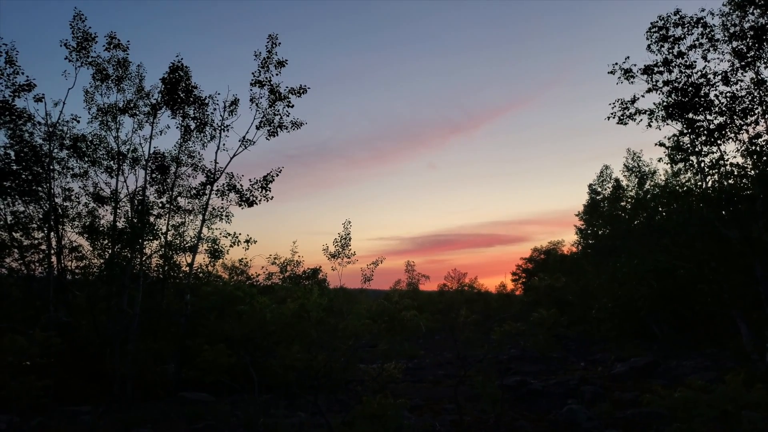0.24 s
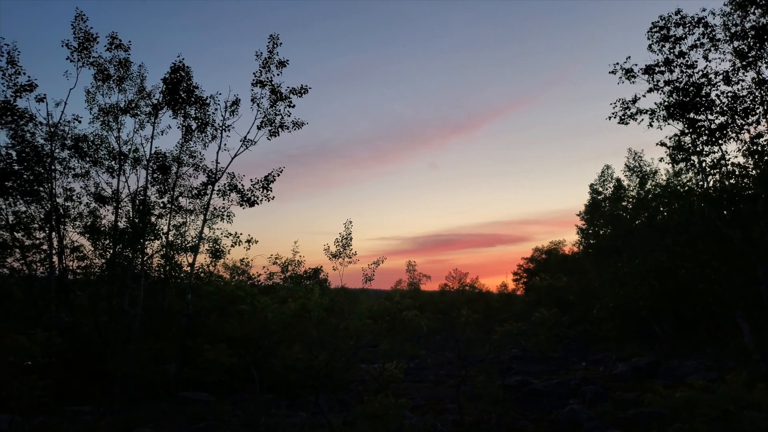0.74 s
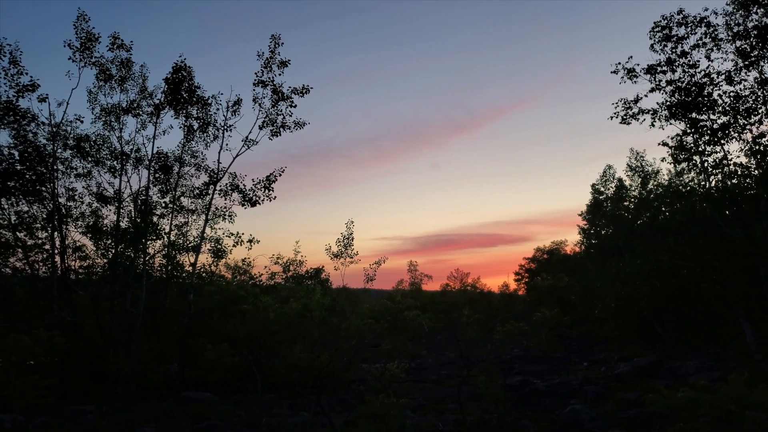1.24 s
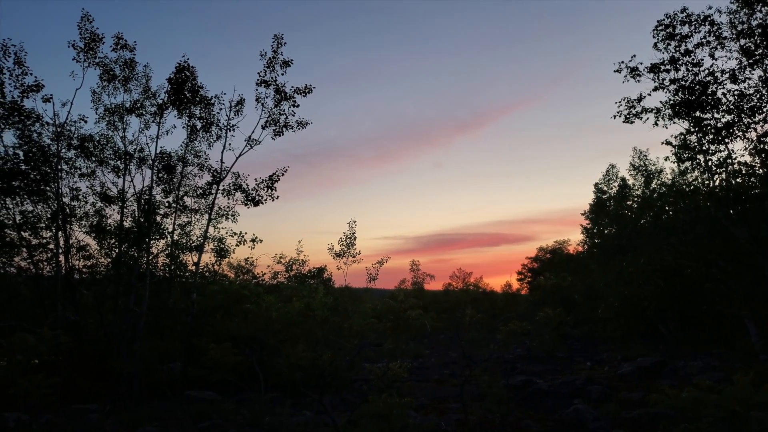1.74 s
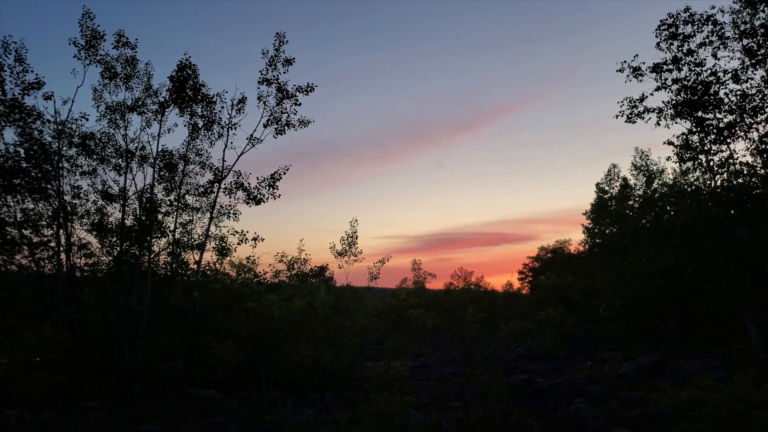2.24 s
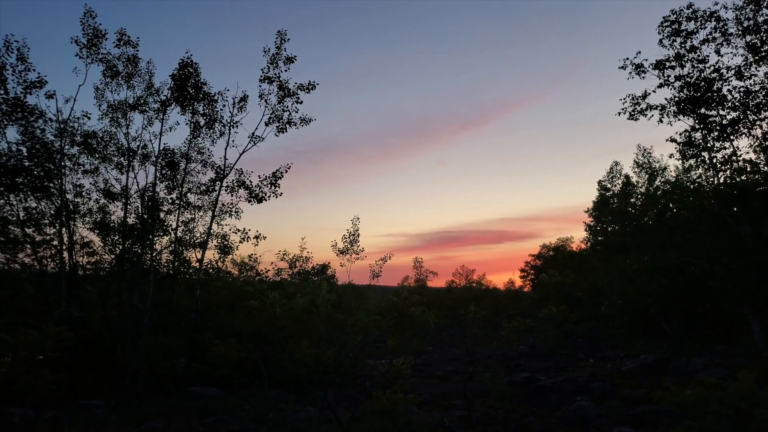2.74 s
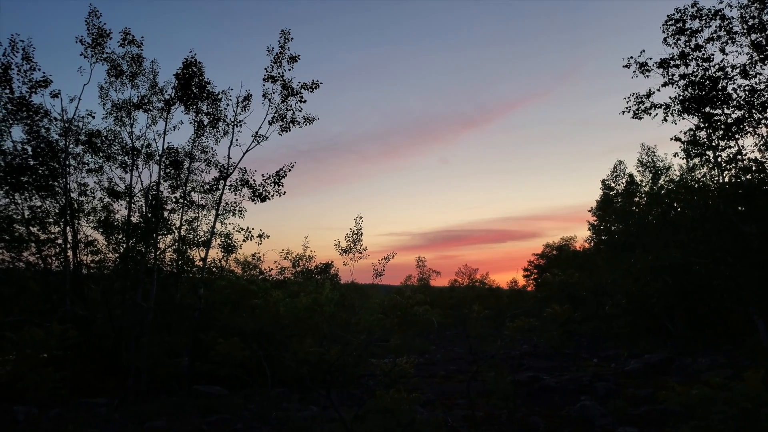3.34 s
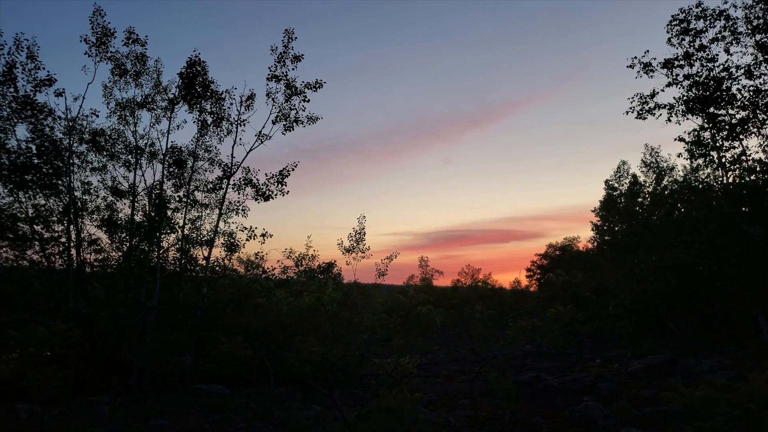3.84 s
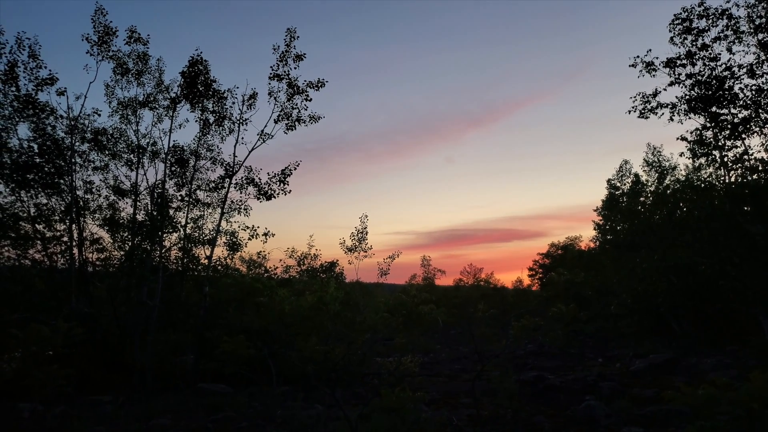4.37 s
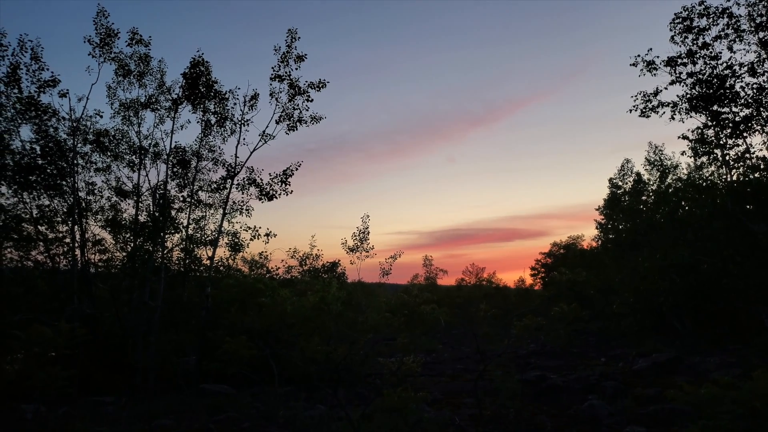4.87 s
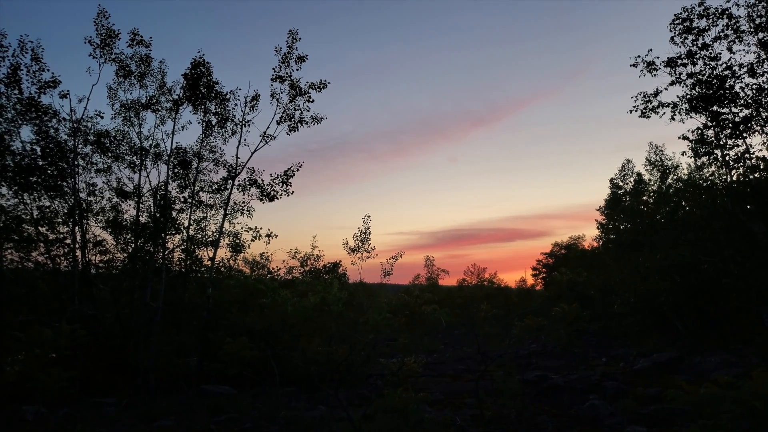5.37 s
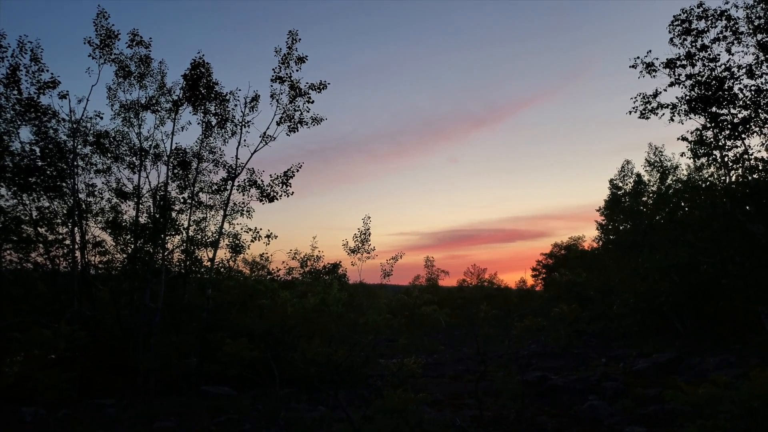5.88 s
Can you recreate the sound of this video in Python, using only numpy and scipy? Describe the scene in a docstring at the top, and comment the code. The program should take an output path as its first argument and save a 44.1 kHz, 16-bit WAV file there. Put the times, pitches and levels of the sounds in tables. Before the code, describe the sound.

A whip-poor-will whistles its three-note song six times in a dusk clearing, echoing off trees, while nighthawks buzz harshly and treefrogs trill faintly behind.

```python
"""A clearing at dusk. A whip-poor-will sings six times from the left: three frequency-modulated whistled notes
that echo in the trees; a soft cluck leads into each song but the first, and one more ends the scene.
Nighthawks, high tones chopped into pulses, buzz near and far; another bird adds a thin rising whistle.
Behind them lie pulsed treefrog trills in a wash of filtered noise, faint blurred bird calls, soft low bumps,
a low rumble with a faint hum, a murmur, and microphone hiss."""
import sys
import numpy as np
from scipy import signal
from scipy.fft import rfft, irfft, next_fast_len
from scipy.io import wavfile
from scipy.ndimage import uniform_filter1d

SR = 44100
rng = np.random.default_rng(int(sys.argv[2]) if len(sys.argv) > 2 else 0)


def wav_out(sig):
    """Save sig, one row per channel (or a flat mono array), as 16-bit PCM at SR to the path in sys.argv[1]."""
    wavfile.write(sys.argv[1], SR, np.round(np.clip(np.atleast_2d(sig).T, -1, 1) * 32767).astype(np.int16))


N = 269451
TIME = np.arange(N) / SR  # seconds

# All levels in dB are relative: each layer is also weighted where it is mixed.
# Treefrog chorus over time. Each row: time in seconds, chorus level in dB, nearest trills in dB against the wash.
FROG_LEVELS = [(0, -59, -10), (.3, -58.5, 0), (.65, -50, -8), (1.3, -59.5, 7), (2.3, -51, -11.5),
               (3.2, -55, -14.5), (4.4, -49.5, 4), (5.5, -56.5, -1), (6.1, -55.5, -1.5)]
# One pulse of a treefrog's trill. Each row: time in seconds, fundamental in Hz, level in dB.
FROG_PULSE = [(0, 842, -32.5), (.012, 916, 0.5), (.022, 1153, 3.5), (.032, 1100, -18)]
# Spectrum of the merged far-off frogs. Each row: frequency in Hz, level in dB.
CHORUS_SPECTRUM = [(700, -44), (850, -26.5), (980, -3.5), (1150, -11.5), (1400, -3.5), (1600, -17),
                   (1900, 6.5), (2150, -3.5), (2350, -15.5), (2550, -25), (2750, -23.5), (3000, -35),
                   (5000, -42)]

# Low background beside a moderate song. Each row: time in seconds, rumble in dB, swelling part of the murmur in dB.
LOW_LEVELS = [(0, -58, -59.5), (1.3, -60, -72), (2.7, -62, -68), (3.9, -59.5, -67.5), (4.5, -58, -73.5),
              (5.25, -58, -61.5), (5.7, -58.5, -78), (6.11, -54, -59.5)]
# Spectrum of the low rumble. Each row: frequency in Hz, level in dB.
RUMBLE_SPECTRUM = [(12, -28.5), (22, -14.5), (32, -9.5), (50, -2.5), (68, 5.5), (90, 0.5), (115, -3),
                   (150, -11.5), (250, -48.5)]
# Spectrum of the soft murmur. Each row: frequency in Hz, level in dB.
MURMUR_SPECTRUM = [(100, -18.5), (170, -2.5), (260, -1.5), (400, -4), (650, -9), (1000, -8), (3000, -8),
                   (6000, -33)]
# Spectrum of the microphone hiss. Each row: frequency in Hz, level in dB.
HISS_SPECTRUM = [(2000, 0.5), (5000, 0.5), (7500, -9), (10000, -3), (12500, 2), (16000, -1.5)]

# Faint far-off bird calls.
# Each row: centre in seconds, length in seconds, centre pitch in Hz, bandwidth in Hz, level in dB.
FAR_CALLS = [(.06, 0.17, 3430, 250, -70.5), (0.26, 0.073, 2750, 109, -71), (0.461, 0.093, 2646, 127, -68),
             (1.845, 0.11, 3780, 348, -57.5), (2.867, .25, 4140, 541, -63.5), (2.942, 0.19, 3570, 450, -71),
             (4.17, 0.07, 3090, 129, -55), (4.175, 0.13, 4100, 250, -54.5), (4.68, 0.25, 4050, 597, -61.5)]
# Thin rising whistle. Each row: time in seconds, pitch in Hz, level in dB.
RISING_WHISTLE = [(4.12, 3674, -58), (4.16, 3640, -56), (4.29, 3814, -52.5), (4.37, 4037, -48.5),
                  (4.46, 4087, -58), (4.52, 4190, -68), (4.6, 4380, -62.5), (4.72, 4420, -65)]

# Nighthawk calls. Each row: start in seconds, nominal length in seconds, level in dB, swell from start to end
# in dB, echo in dB, treble in dB, pitch shift in Hz, lag of the right ear in seconds.
NIGHTHAWK_CALLS = [(.445, .255, -42.5, -4.5, -14, -19, 150, 0),
                   (0.869, 0.2, -53, 13, -10.5, -2.5, 39.5, .0019),
                   (1.858, 0.22, -32.5, -1.5, -14, -1.5, -69.5, 0.021),
                   (3.308, .22, -30.5, -6, -11.5, -0.5, 36, 0.0046),
                   (3.934, .22, -50, -9, -6, -15.5, 0, 0.0012),
                   (5.083, .24, -30, -4.5, -15.5, 0, -1.5, .0068),
                   (5.65, 0.26, -45, 0, -19.5, -31.5, -91.5, .032)]
# Course of one such call. Each row: share of its length, pulses per second, pitch in Hz, level in dB.
NIGHTHAWK_COURSE = [(0, 244, 4400, -29), (.11, 242, 4750, -4.5), (.3, 240, 4840, .5), (.46, 235, 4760, .5),
                    (.62, 238, 4480, -.5), (.74, 246, 4130, -1.5), (.85, 252, 3830, -1.5),
                    (.95, 248, 3650, -3), (1.04, 240, 3560, -22)]
# Tones carried by every pulse. Each row: multiple of the pitch, level in dB, pulse width in seconds.
PULSE_TONES = [(0.99, 1.6, 0.00039), (4 / 5, -6, 0.00021)]
# Spectrum of the broad rasp around the tones. Each row: frequency in Hz, level in dB.
RASP_SPECTRUM = [(1800, -44), (2600, -10), (3200, -5.5), (3900, 8), (4900, -4.5), (5500, -13), (6500, -22),
                 (9000, -49.5)]
# Spectrum of the call's treble. Each row: frequency in Hz, level in dB.
TREBLE_SPECTRUM = [(4500, -28.5), (5800, -8), (6600, 3), (7600, -4.5), (8800, -5.5), (9900, -12),
                   (10700, -14.5), (11600, -21), (13000, -40.5)]

# Whip-poor-will songs. Each row: time of "whip" in seconds, time of "poor" in seconds, peak of "will" in seconds,
# length of its drop in seconds, level of "whip" in dB, level of the other notes in dB, pitch shift in Hz.
SONGS = [(0.4528, 0.789, 0.97, 0.067, -5.5, -3, -14), (1.4335, 1.7618, 1.937, 0.067, -2, -0.5, 15),
         (2.37, 2.688, 2.873, 0.069, 0, -1, -5), (3.3094, 3.631, 3.8161, 0.065, 0.5, -.3, -15),
         (4.265, 4.5908, 4.7758, 0.06, -.5, 0, 15), (5.2088, 5.5284, 5.7179, 0.064, 1, 0, 0)]
# Arched syllables of "whip". Each row: delay from the note's time in seconds, rise in seconds, fall in seconds,
# start pitch in Hz, top pitch in Hz, end pitch in Hz, level in dB, swell from start to end in dB.
WHIP_SYLLABLES = [(-.001, 0.018, 0.013, 1301, 1418, 1420, -28, 6),
                  (.013, .042, .04, 1433, 1695, 1544, -31, -7.5)]
# Arched syllables of "poor". Each row: delay from the note's time in seconds, rise in seconds, fall in seconds,
# start pitch in Hz, top pitch in Hz, end pitch in Hz, level in dB, swell from start to end in dB.
POOR_SYLLABLES = [(-.075, .05, .028, 1190, 1288, 1253, -40, 14),
                  (-.008, 0.0457, 0.03794, 1329, 1563, 1211, -26, 5.8),
                  (.064, 0.04364, 0.037, 1290, 1580, 1347, -25.5, 1)]
# Overtones of the whistle. Each row: multiple of the fundamental, level in dB.
OVERTONES = [(2, -46.5), (3, -46), (4, -49.5)]
# Instants of the soft clucks. Each entry: time in seconds.
CLUCK_TIMES = [1.351, 2.29, 3.23, 4.188, 5.133, 6.074]
# The falling cluck. Each row: time from its instant in seconds, pitch in Hz, level in dB.
CLUCK = [(-.006, 1150, -68), (.003, 994, -46), (.011, 754, -65), (0.017, 700, -62.5), (.03, 620, -74.5)]
# Colour of the trees that return the song late. Each row: frequency in Hz, gain in dB.
LATE_ECHO = [(1300, -2), (1560, 0), (1660, 3), (1760, -1), (1860, -8), (2200, -11), (2700, -16)]

# Soft low bumps. Each row: time in seconds, level in dB.
BUMPS = [(1.57, -44), (1.948, -41), (5.641, -43), (5.811, -42.5)]

# The low background follows the animals' level about this reference, by a share of each dB.
MODERATE_SONG_DB = -35
RUMBLE_FOLLOWS, MURMUR_FOLLOWS, MURMUR_REST_DB = .3, 0.67, -70
RUMBLE_SMOOTH_S, MURMUR_SMOOTH_S, MURMUR_LAG_S = .07, 0.29, .04

# "will" climbs in quick steps to its top, drops, levels out and droops as it ends.
WILL_TOP_HZ, WILL_LEVEL_OUT_HZ, WILL_DB = 2713, 1762, -17
CLIMB_S, CLIMB_HZ_PER_S, CLIMB_DB = .052, 24000, 9.5
STEP_S, STEP_SWING_HZ, STEP_DIP_DB = .0127, 135, 9
DROP_HALF_S, DROOP_HZ, DROOP_S = .015, 262, 0.0089
ATTACK_S, RELEASE_S = 0.0093, 0.033
PORT_LAG_S = .00005  # the song reaches the right microphone port later
CUTOFF_HZ = 15800


def from_db(db):
    """Amplitude gain is the exponential of the level in decibels."""
    return 10 ** (np.asarray(db) / 20)


def rms_one(x):
    """Normalisation: dividing by the effective value gives an rms of one."""
    return x / np.sqrt(np.mean(x ** 2) + 1e-20)


def along(rows, t):
    """Linear interpolation: the columns of a table read at t, its first column."""
    knots, *columns = np.transpose(rows)
    return [np.interp(t, knots, c) for c in columns]


def delayed(x, lag_s):
    """Propagation delay: the same signal, lag_s later."""
    return np.interp(TIME - lag_s, TIME, x)


def pan(left_db):
    """Level difference between the ears: gains of two channels that differ by left_db."""
    return from_db(np.array([[.5], [-.5]]) * left_db)


def colour(x, spectrum):
    """Linear filtering: each frequency is weighted by a (Hz, dB) curve."""
    hz, db = np.transpose(spectrum)
    size = next_fast_len(x.shape[-1])
    bins = np.maximum(np.arange(size // 2 + 1) * SR / size, 1)
    gain = from_db(np.interp(np.log(bins), np.log(hz), db))
    return irfft(rfft(x, size) * gain, size)[..., :x.shape[-1]]


def drift(rate, size):
    """Slow random modulation: lines join `rate` normal draws of unit deviation per second."""
    return np.interp(np.arange(size) / SR * rate, np.arange(4000), rng.standard_normal(4000))


def stereo_noise(spectrum, alike):
    """Partial coherence: shared and opposed noise give the channels the correlation `alike`; rms one."""
    mid, side = rng.standard_normal((2, N))
    alike = np.clip(alike, -1, 1)
    shared = np.sqrt(1 + alike) * mid
    opposed = np.sqrt(1 - alike) * side * [[1], [-1]]
    return rms_one(colour(shared + opposed, spectrum))


def woods(x, t60, build_s, grain_db):
    """Multiple scattering: echoes from countless trunks build up and decay, unrelated in the two channels."""
    t = TIME[:2 * SR]
    grain = from_db(grain_db * rng.standard_normal((2, len(t))))
    scatter = rng.standard_normal((2, len(t))) * grain
    envelope = from_db(-60 * t / t60) * (1 - np.exp(-t / build_s))
    response = rms_one(scatter * envelope) / np.sqrt(len(t))  # unit energy
    return signal.fftconvolve(x[None], response, axes=1)[:, :N]


def note(shape, start, shift_hz, waver, flutter_db):
    """Frequency modulation: phase is the integral of pitch; returns samples, phase and amplitude."""
    at = np.flatnonzero((TIME > start + shape[0][0]) & (TIME < start + shape[-1][0]))
    hz, db = along(shape, TIME[at] - start)
    hz = uniform_filter1d(hz + shift_hz, size=80) * (1 + waver * drift(250, len(at)))
    phase = 2 * np.pi * np.cumsum(hz) / SR
    return at, phase, np.sqrt(2) * from_db(db + flutter_db * drift(200, len(at)))


def treefrogs():
    """Pulsed resonance: frogs trill at their own pitch and pace, and the farthest merge into a wash of noise."""
    trills = np.zeros(N + 3 * SR)  # begins one second early
    for start in np.linspace(-.4, 5.9, num=18):
        late, shift, pace, loud = rng.standard_normal(4)
        at, phase, height = note(FROG_PULSE, 0, 40 * shift, waver=0.016, flutter_db=7.0)
        tone = 0.36 * np.sin(phase) + np.sin(2 * phase)  # the throat sac favours the octave
        pulse = from_db(2 * loud) * height * tone
        gaps = (1 + .13 * rng.standard_normal(12)) / (18 + 1.2 * pace)  # near 18 pulses per second
        for s in start - .05 + .06 * late + np.cumsum(gaps):
            trills[at + int((s + 1) * SR)] += pulse
    trills = trills[SR:SR + N]
    heard = rms_one(trills + .9 * woods(trills, t60=.2, build_s=.002, grain_db=5))
    level_db, trill_db = along(FROG_LEVELS, TIME)
    wash = stereo_noise(CHORUS_SPECTRUM, alike=0.93)
    return from_db(level_db - 1.0) * (heard * from_db(trill_db) + wash) * pan(8.2)


def loudness_db(x, smooth_s):
    """Short-time mean power: running level of a stereo sound above that of a moderate song."""
    power = uniform_filter1d(np.mean(x ** 2, axis=0), size=max(int(smooth_s * SR), 1))
    return 10 * np.log10(np.abs(power) + 1e-12) - MODERATE_SONG_DB


def background(animals):
    """Envelope following: noise rumble, wavering hum and murmur swell with the animals over steady hiss."""
    base_db, murmur_db = along(LOW_LEVELS, TIME)
    rumble_db = base_db + RUMBLE_FOLLOWS * loudness_db(animals, RUMBLE_SMOOTH_S)
    swell_db = murmur_db + MURMUR_FOLLOWS * delayed(loudness_db(animals, MURMUR_SMOOTH_S), MURMUR_LAG_S)
    rumble = from_db(rumble_db + 1.4 * drift(20, N)) * stereo_noise(RUMBLE_SPECTRUM, alike=0.56) * pan(5)
    hum_gain = from_db(rumble_db - 7.5 + 2.4 * drift(2.5, N))
    hum_phase = 2 * np.pi * np.cumsum(103 + 1.5 * drift(14, N)) / SR
    hum = hum_gain * np.sin(hum_phase) * pan(6.8)
    murmur_gain = np.hypot(from_db(MURMUR_REST_DB), from_db(swell_db))  # powers add
    murmur = murmur_gain * stereo_noise(MURMUR_SPECTRUM, alike=0.33) * pan(4.5)
    hiss = from_db(-71.0) * stereo_noise(HISS_SPECTRUM, alike=0) * pan(2.5)
    return rumble + hum + murmur + hiss


def other_birds():
    """Modulated tone and band-limited noise: one rising whistle, and a few calls blurred by distance."""
    whistle = np.zeros(N)
    at, phase, height = note(RISING_WHISTLE, 0, 0, waver=0.016, flutter_db=2.0)
    whistle[at] = height * np.sin(phase)
    far = np.zeros((2, N))
    for s, length, hz, width_hz, db in FAR_CALLS:
        band = signal.butter(2, [hz - width_hz / 2, hz + width_hz / 2], "band", fs=SR, output="sos")
        blur = rms_one(signal.sosfilt(band, rng.standard_normal((2, N))))
        far += from_db(db) * np.exp(-(2 * (TIME - s) / length) ** 2) * blur
    echo = woods(whistle, t60=0.37, build_s=.003, grain_db=-0.5)
    return from_db(-7) * whistle * pan(12) + (from_db(-1) * echo + far) * pan(11)


def nighthawks():
    """Pulse modulation: a high tone chopped into sharp pulses arches, then slides down and roughens."""
    direct, to_trees = np.zeros((2, N)), np.zeros(N)
    for start, length, level_db, swell_db, echo_db, treble_db, shift_hz, lag in NIGHTHAWK_CALLS:
        at = np.flatnonzero((TIME > start) & (TIME < start + NIGHTHAWK_COURSE[-1][0] * length))
        share = (TIME[at] - start) / length
        rate, hz, db = along(NIGHTHAWK_COURSE, share)
        cycles = np.cumsum(rate * (1 + .01 * drift(200, len(at)))) / SR
        age = cycles % 1 / rate  # seconds since the last pulse
        waver = (.002 + .006 * share) * drift(250, len(at))
        phase = 2 * np.pi * np.cumsum((hz + shift_hz) * (1 + waver)) / SR
        tones = 0
        for multiple, tone_db, width in PULSE_TONES:
            pulse = age / width * np.exp(-age / width)
            tones = tones + from_db(tone_db) * pulse * np.sin(multiple * phase)
        tone_curve = [(1500, -41.5), (2700, -9.5), (3300, 2.5), (5100, -5.5), (5800, -11), (8000, -32.5)]
        tones = colour(rms_one(tones), tone_curve)
        rasp = rms_one(rng.standard_normal(N)[at] * np.exp(-age / 0.00064))
        octave = rms_one(np.exp(-age / 0.00057) * np.sin(2 * phase))
        body = rms_one(colour(rasp, RASP_SPECTRUM))
        treble = rms_one(colour(0.54 * octave + rasp, TREBLE_SPECTRUM))
        buzz = tones + from_db(-12.5) * body + from_db(treble_db - 21.0) * treble
        call = from_db(level_db + db + swell_db * (share - .5)) * buzz
        straight = call / (1 + from_db(echo_db))  # the farther the bird, the more of it arrives scattered
        direct[0, at] += straight
        direct[1, at + round(lag * SR)] += straight
        to_trees[at] += from_db(echo_db) * call
    ground = woods(direct[0], t60=0.12, build_s=0.006, grain_db=-2.5)
    to_trees = colour(to_trees, [(4500, 1.8), (6000, -1), (10000, -0.5)])  # air dulls the long paths
    echo = woods(to_trees, t60=0.78, build_s=0.0092, grain_db=-1.0)
    return from_db(-2.5) * direct * pan(13.2) + from_db(-2.0) * ground * pan(9) + from_db(1.5) * echo * pan(9.8)


def fade_db(t):
    """Amplitude envelope: attack, hold and release of a syllable that spans the times t."""
    opening = np.clip((t - t[0]) / ATTACK_S, .01, 1) * np.clip((t[-1] - t) / RELEASE_S, .01, 1)
    return 20 * np.log10(np.sin(np.pi / 2 * opening))


def arch(delay, rise_s, fall_s, start_hz, top_hz, end_hz, level_db, swell_db):
    """Parabolic glide: pitch rises to a rounded top and sinks again; rows of seconds, Hz, dB."""
    t = np.linspace(-rise_s, fall_s, num=100)
    rising_sag = (top_hz - start_hz) * (t / rise_s) ** 2
    falling_sag = (top_hz - end_hz) * (t / fall_s) ** 2
    hz = top_hz - np.where(t < 0, rising_sag, falling_sag)
    db = level_db + swell_db * t / (rise_s + fall_s) + fade_db(t)
    return np.transpose([delay + rise_s + t, hz, db])


def will(drop_s):
    """Stepped glide: the voice dips between steps that even out towards the top; rows of seconds, Hz, dB."""
    t = np.linspace(-CLIMB_S, drop_s, num=200)
    before, after = np.maximum(-t, 0), np.maximum(t, 0)  # seconds from the top
    step, depth = np.cos(2 * np.pi * before / STEP_S), np.sqrt(before / CLIMB_S)
    climb_hz = -CLIMB_HZ_PER_S * before - STEP_SWING_HZ * depth * step
    drop_hz = (WILL_TOP_HZ - WILL_LEVEL_OUT_HZ) / (1 + (after / DROP_HALF_S) ** 2)
    droop_hz = DROOP_HZ * np.exp((t - drop_s) / DROOP_S)
    db = WILL_DB - CLIMB_DB * (before / CLIMB_S) ** 2 - STEP_DIP_DB * depth * (1 + step) / 2
    return np.transpose([t, WILL_LEVEL_OUT_HZ + climb_hz + drop_hz - droop_hz, db + fade_db(t)])


def whip_poor_will():
    """Whistle and reverberation: a nearly pure modulated tone from the left, with its echo in the trees."""
    voice, overtones = np.zeros((2, N))
    notes = [(CLUCK, s, 0, 0) for s in CLUCK_TIMES]
    for whip_s, poor_s, will_s, drop_s, whip_db, db, hz in SONGS:
        notes += [(arch(*row), whip_s, whip_db, hz) for row in WHIP_SYLLABLES]
        notes += [(arch(*row), poor_s, db, hz) for row in POOR_SYLLABLES]
        notes += [(will(drop_s), will_s, db, hz)]
    for shape, start, level_db, shift_hz in notes:
        at, phase, height = note(shape, start, shift_hz, waver=0.0052, flutter_db=1.5)
        height = height * from_db(level_db)
        voice[at] += height * np.sin(phase)
        for multiple, db in OVERTONES:
            overtones[at] += height * from_db(db) * np.sin(multiple * phase)
    # the throat passes little above the top note
    voice = colour(voice, [(2700, -1), (2800, -3.0), (2950, -23.5)])
    overtone_curve = [(3500, 4.5), (5000, -6.5), (5800, -17.0), (6500, 3), (7300, 1.5), (8100, 4), (9000, -8.0)]
    overtones = colour(overtones, overtone_curve)
    # a faint hiss swells with the loud notes
    hiss = colour(voice * rng.standard_normal(N), [(3000, -10.0), (9000, -7.5), (12000, 2.5)])
    # the far microphone port is shaded, more at some pitches than at others
    shade = [(1000, -11.5), (1400, -19.5), (1700, -3), (2000, -4), (2300, -0.5), (2700, -1.5)]
    shaded = colour(delayed(voice, PORT_LAG_S), shade)
    direct = np.array([from_db(1.54) * voice, shaded])
    near = woods(voice, t60=0.55, build_s=0.0027, grain_db=0.0)
    # the edge of the clearing and the far forest answer later, mostly with the lower notes
    dulled = colour(voice, LATE_ECHO)
    edge = woods(delayed(dulled, .068), t60=.2, build_s=.002, grain_db=5)
    far = woods(dulled, t60=0.87, build_s=0.013, grain_db=4)
    late = (from_db(-13) * edge + from_db(-9.5) * far) * pan(6)
    sheen = woods(overtones, t60=0.37, build_s=0.0021, grain_db=0) * pan(12.0)
    sheen += from_db(-43) * woods(hiss, t60=0.37, build_s=0.0037, grain_db=7.5) * pan(1.5)
    return direct + from_db(-5.0) * near * pan(3.1) + late + sheen


def bumps():
    """Damped oscillation: dull knocks on the right die away within a few cycles."""
    out = np.zeros(N)
    for s, db in BUMPS:
        age = np.maximum(TIME - s, 0)
        out += from_db(db) * np.sin(2 * np.pi * 140 * age) * np.exp(-age / 0.0047)
    return colour(out, [(250, 0), (400, 2), (800, -24)]) * pan(-19)


def scene():
    """Superposition: birds and frogs add to the bumps and the evening background."""
    animals = whip_poor_will() + nighthawks() + other_birds() + treefrogs()
    return animals + bumps() + background(animals)


def record(dry):
    """Band limitation: an elliptic low-pass cuts the top steeply."""
    return signal.sosfilt(signal.ellip(12, .1, 90, CUTOFF_HZ, fs=SR, output="sos"), dry)


dry = scene()
out = record(dry)
wav_out(out)
```